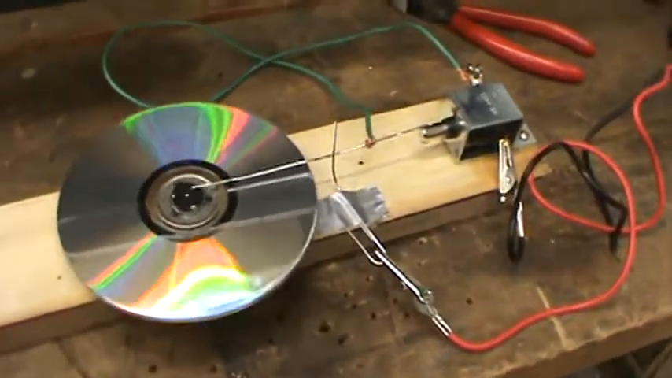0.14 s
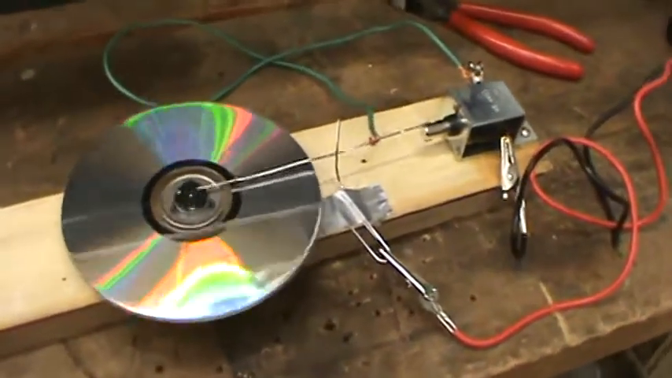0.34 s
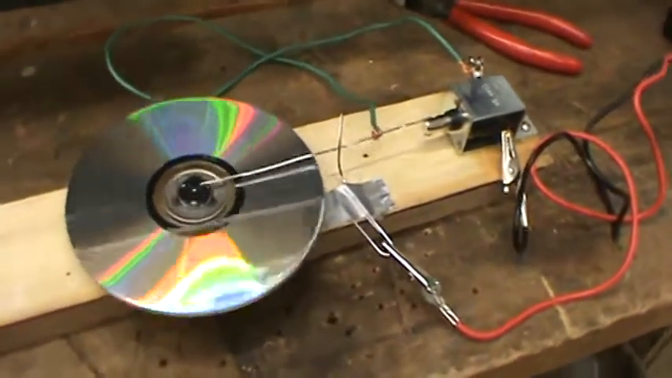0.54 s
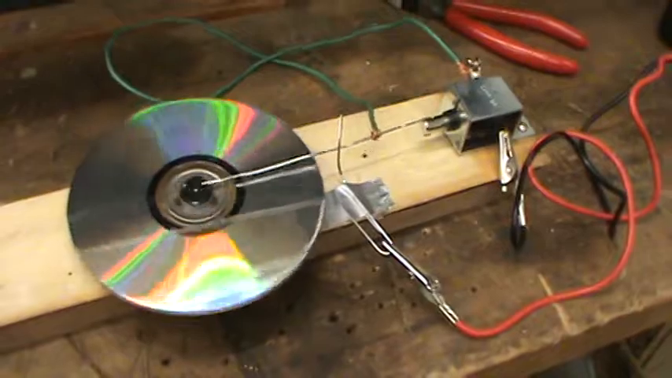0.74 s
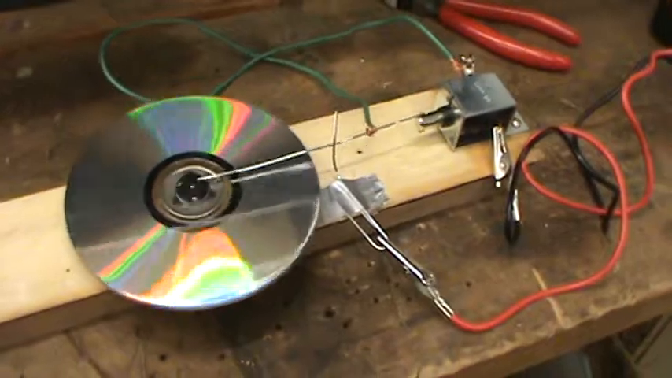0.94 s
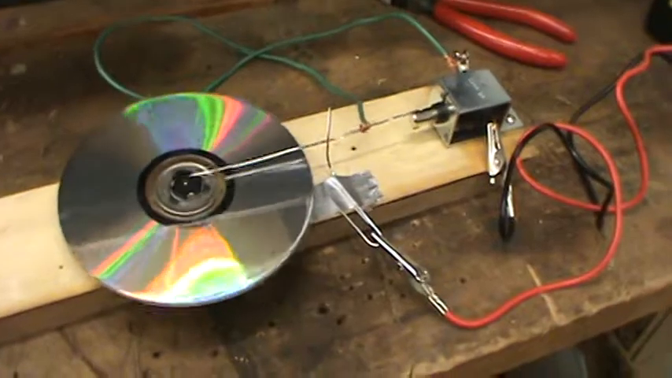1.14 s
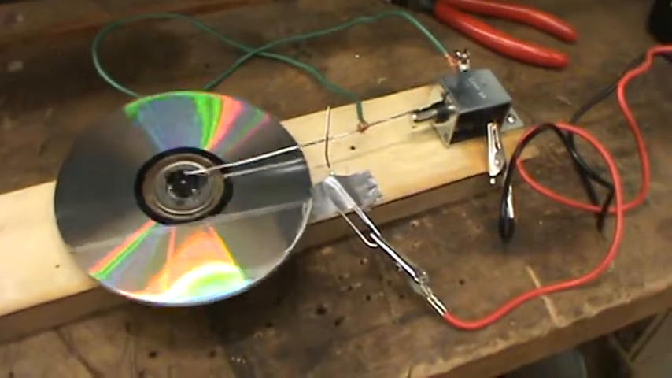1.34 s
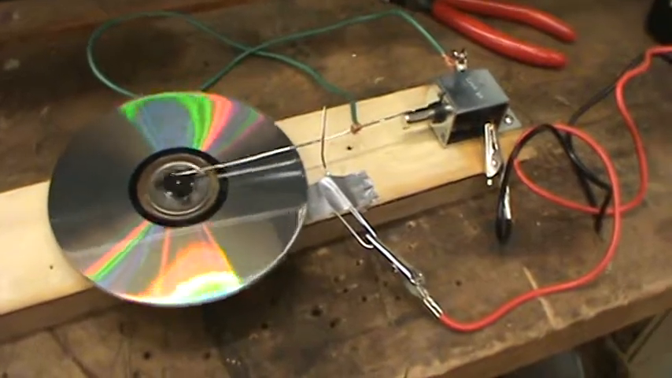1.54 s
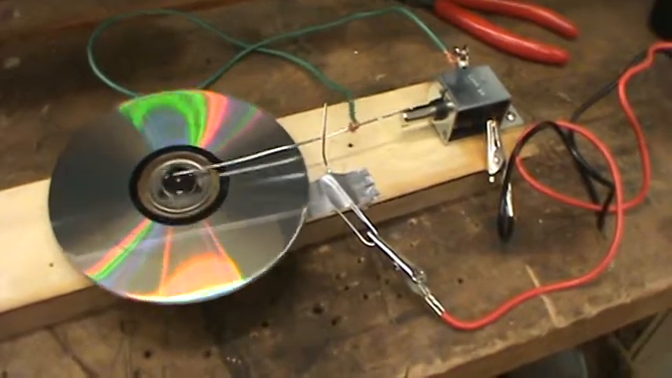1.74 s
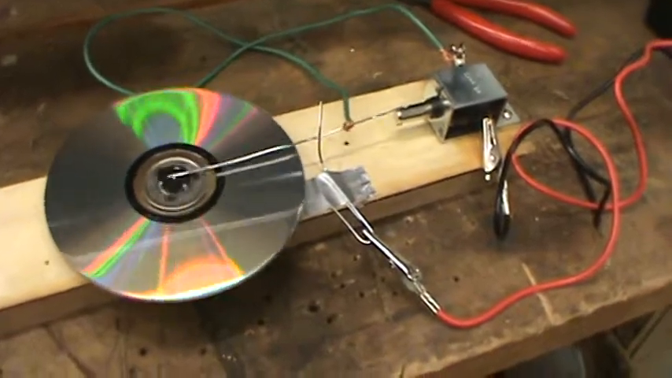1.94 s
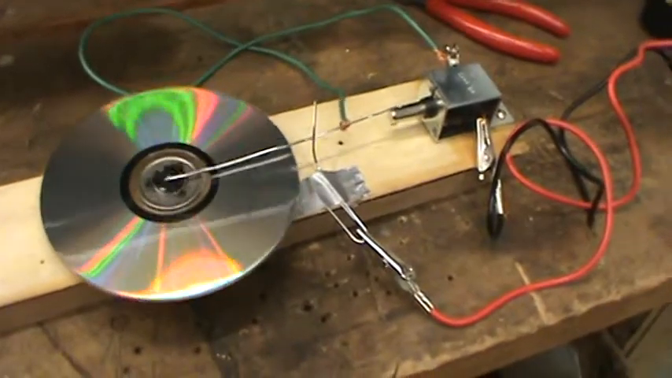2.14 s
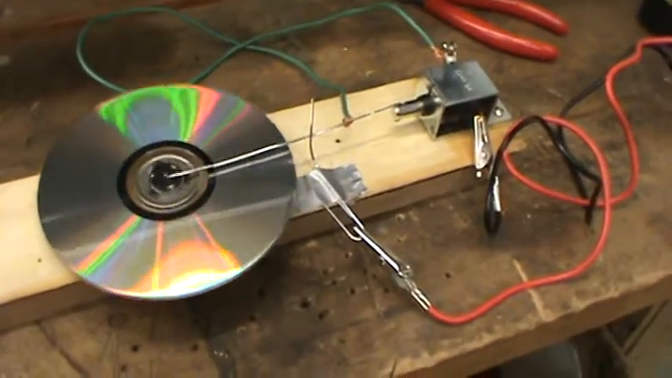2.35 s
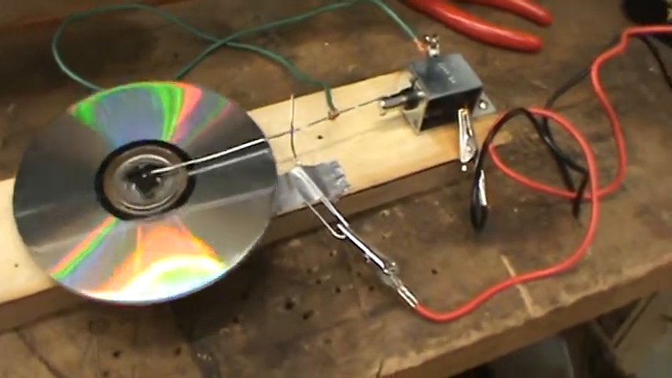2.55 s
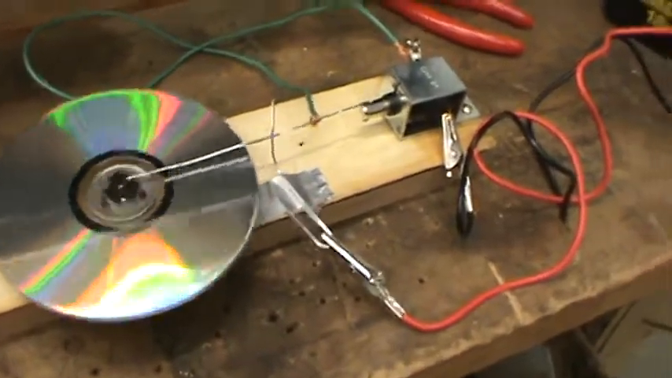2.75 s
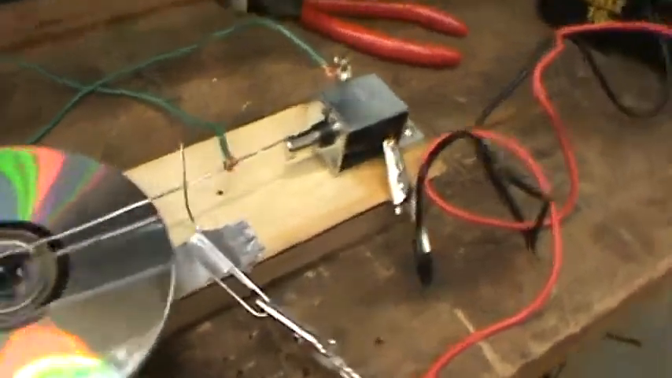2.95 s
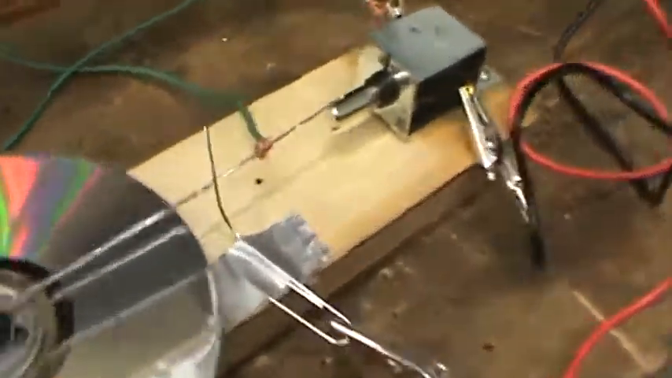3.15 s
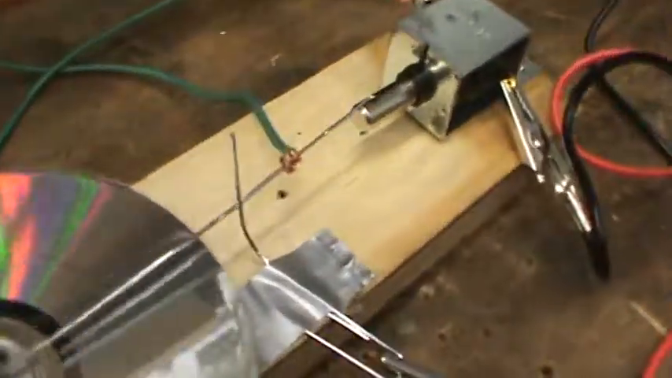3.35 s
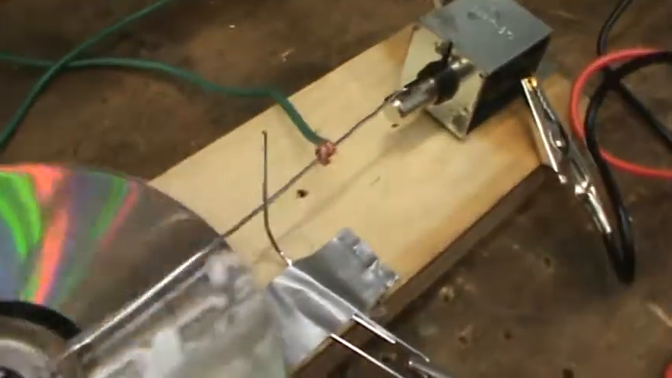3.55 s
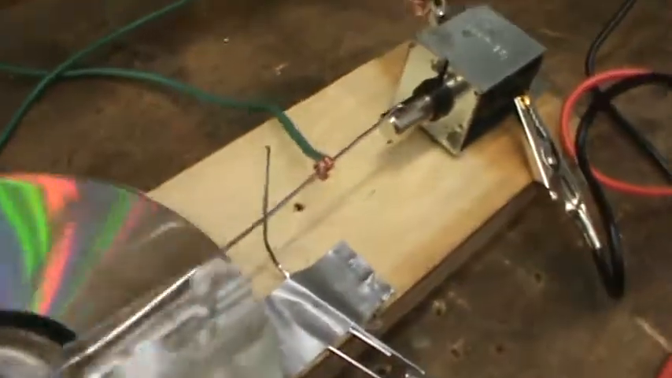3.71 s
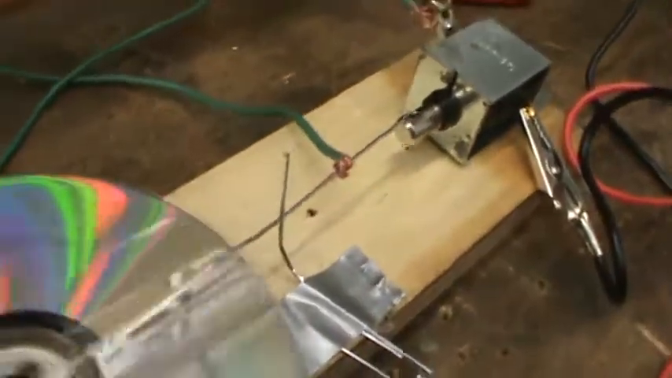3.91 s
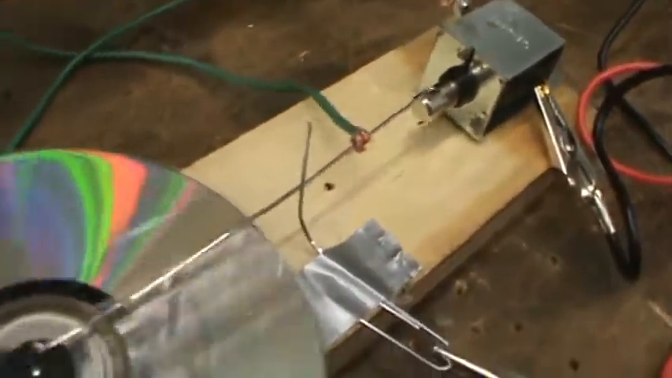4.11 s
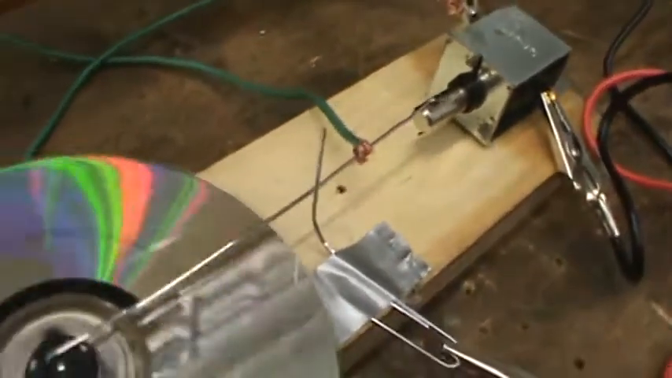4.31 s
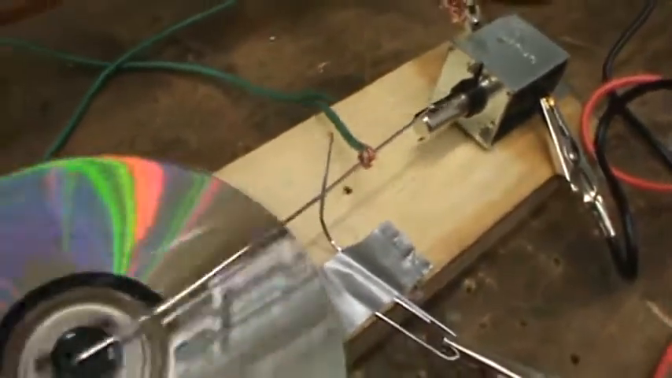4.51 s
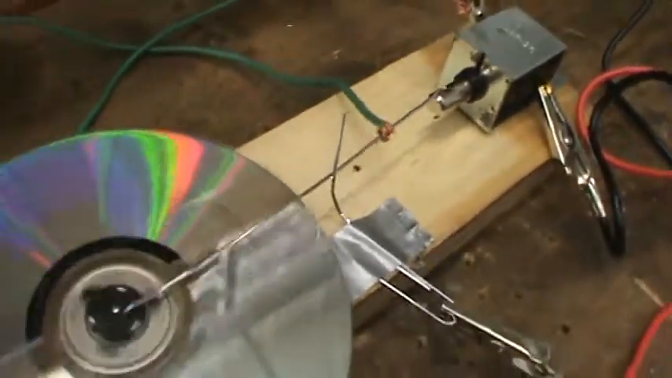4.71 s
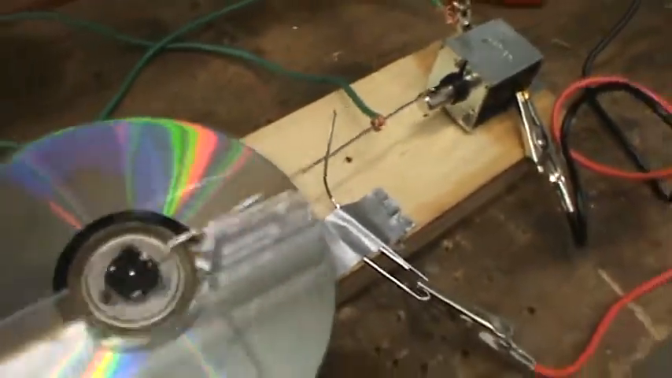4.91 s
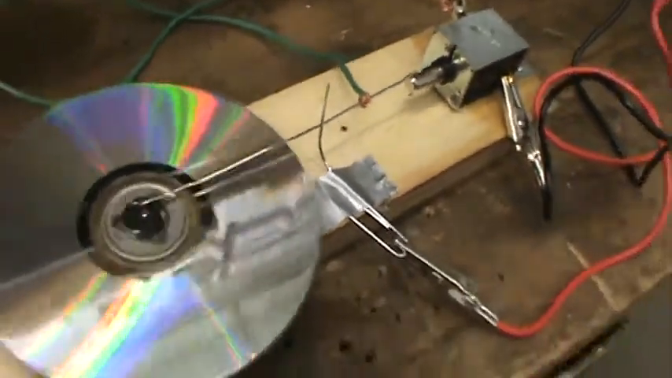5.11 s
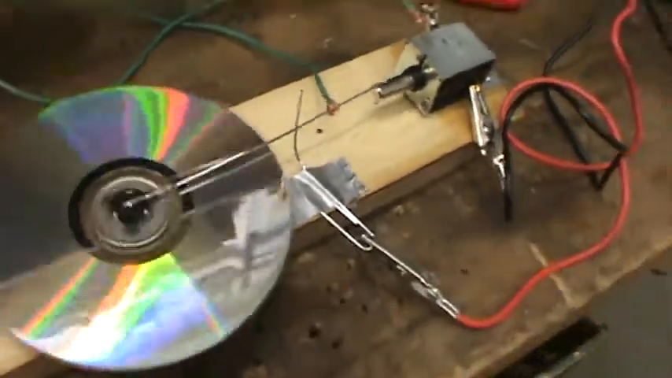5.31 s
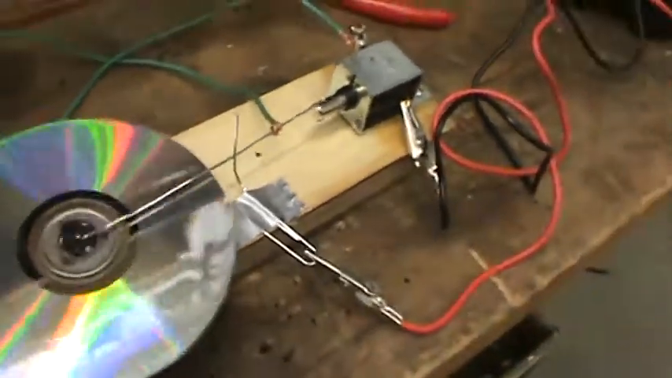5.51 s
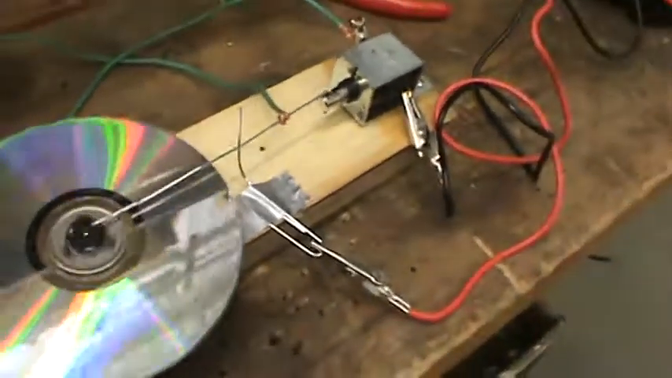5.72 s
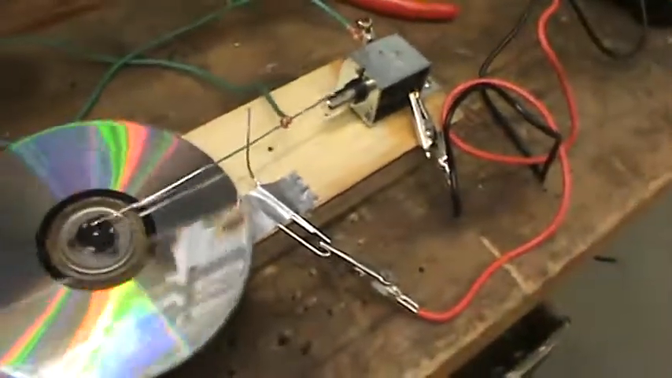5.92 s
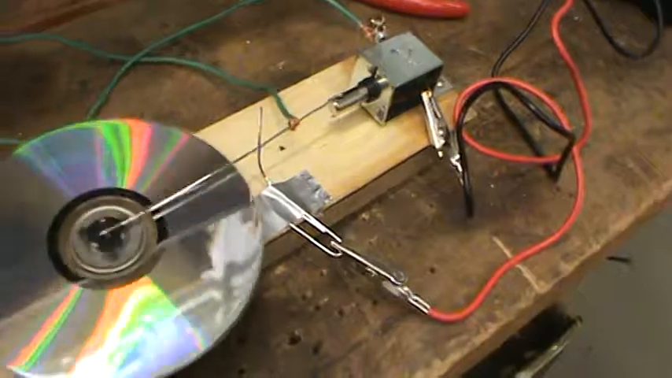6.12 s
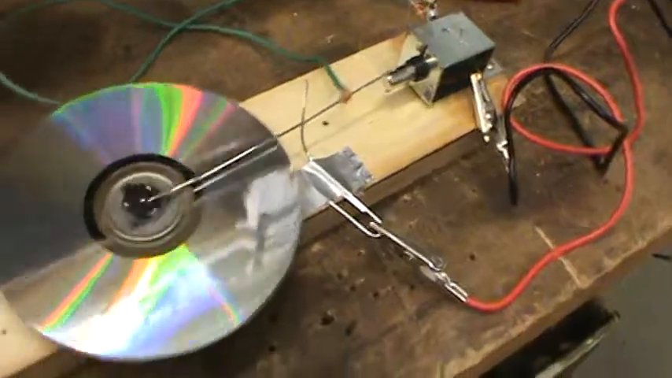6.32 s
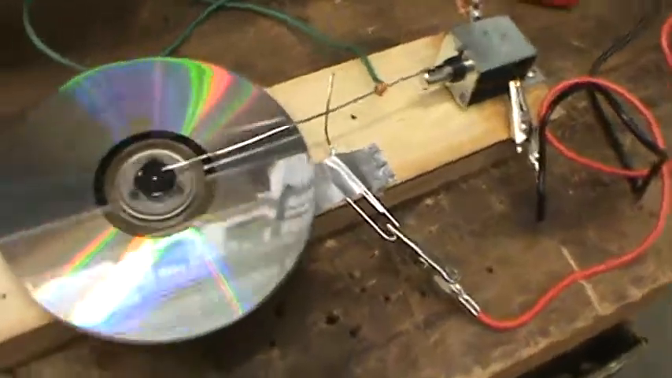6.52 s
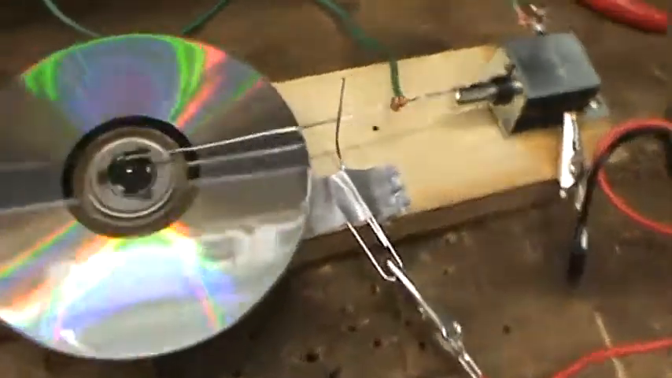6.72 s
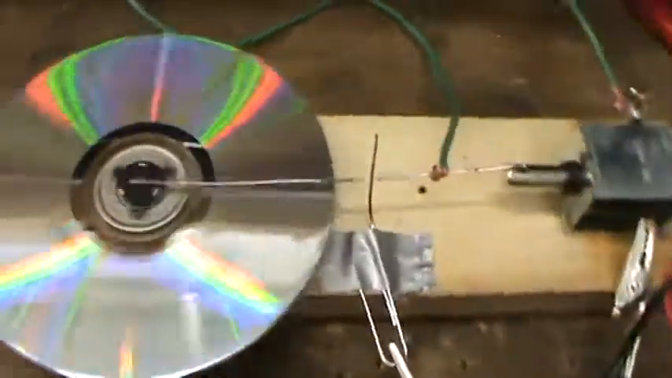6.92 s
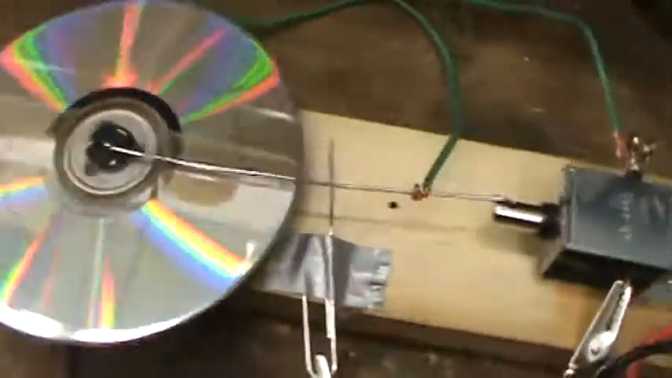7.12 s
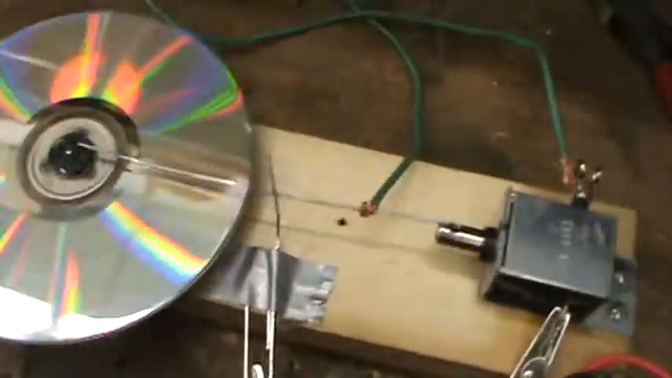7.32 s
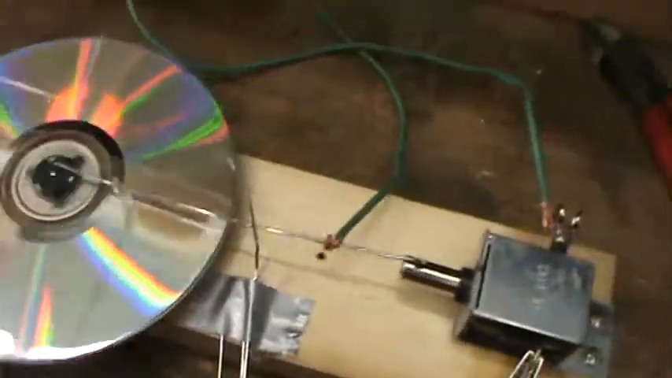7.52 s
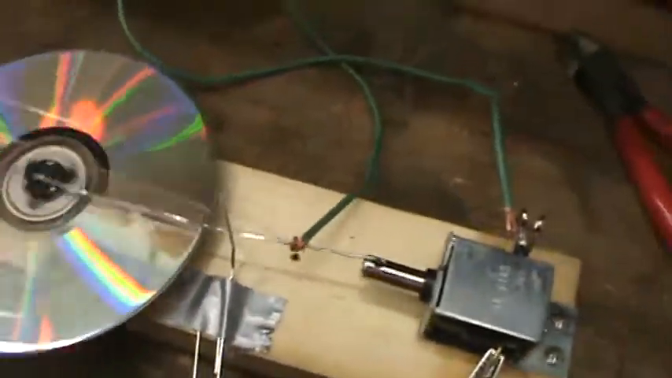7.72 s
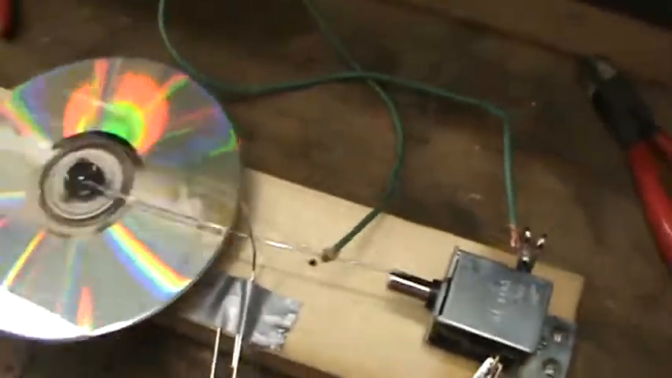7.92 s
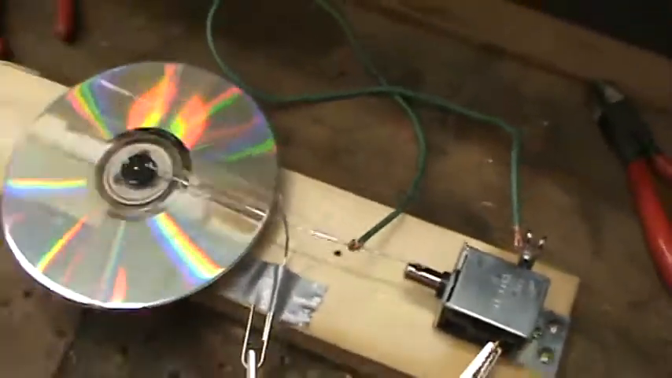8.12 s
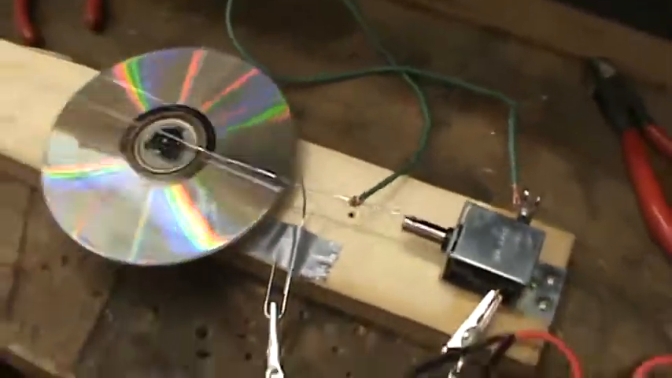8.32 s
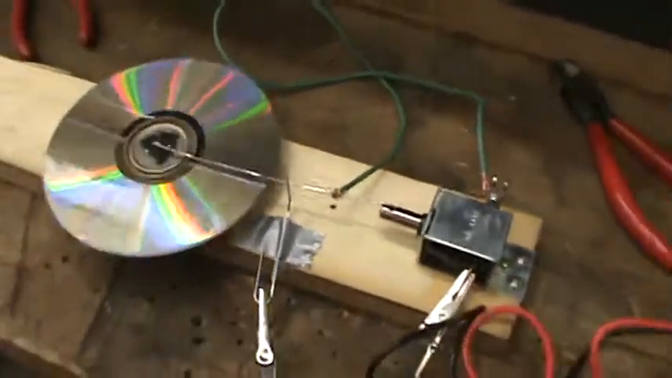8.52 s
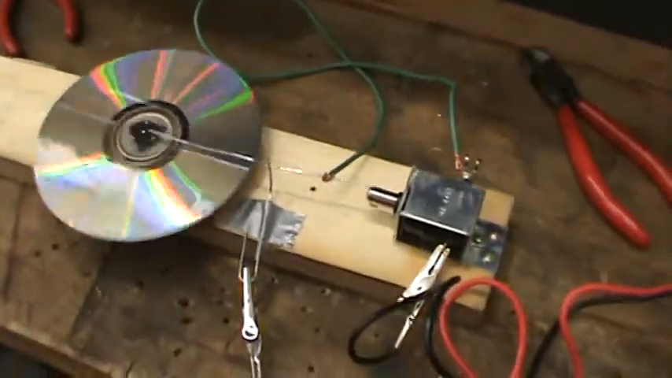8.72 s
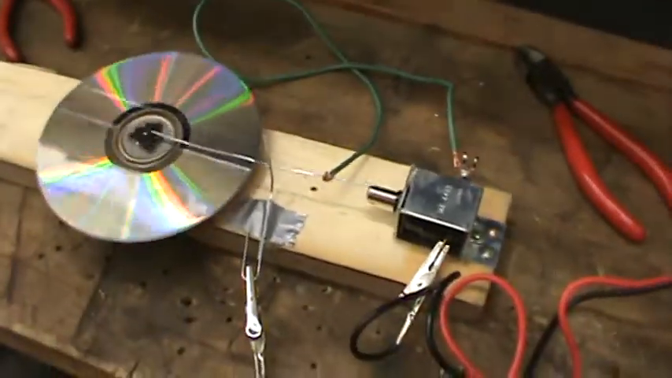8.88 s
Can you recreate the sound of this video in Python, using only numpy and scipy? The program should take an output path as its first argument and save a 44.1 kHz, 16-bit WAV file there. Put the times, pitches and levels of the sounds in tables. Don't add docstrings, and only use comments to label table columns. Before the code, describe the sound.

Fast dry mechanical clatter, already running at the start and never stopping. A springy wire ticks, a plunger knocks in its metal frame and snaps home hard, then scrapes back while loose linkage rattles. The pace gains slightly, and the ticks and rattling grow sharper when the microphone moves closer, around the middle and again near seven seconds. Small workshop, little echo, quiet airy hiss behind.

```python
import sys
import numpy as np
from scipy import signal
from scipy.fft import rfft, irfft, next_fast_len
from scipy.io import wavfile
from scipy.ndimage import uniform_filter1d

SR = 44100
rng = np.random.default_rng(int(sys.argv[2]) if len(sys.argv) > 2 else 0)


def inscribe(sig):
    pcm = np.round(np.clip(np.atleast_2d(sig).T, -1, 1) * 32767)
    wavfile.write(sys.argv[1], SR, pcm.astype(np.int16))


def gain_from_db(level_db):
    decades = np.asarray(level_db, float) / 20
    return 10 ** decades


N = 394694

# hz, level_db (per Hz)
AIR_SPECTRUM = [(30, -23), (200, -12), (1000, -8), (6000, -13.5), (11000, -17.5), (16000, -11)]
# hz, t60_s
ROOM_DECAY = [(300, 0.5), (10000, 0.064)]
# hz, left_minus_right_db
CAPSULE_LEAN = [(60, -1), (1300, 0.3), (2300, 1.5), (4400, 1.2), (9000, -0.5), (14000, -1.5)]
# time_s, overhead (-1..2.2), bench_db, rattle_db, coil_side (about -1..1)
CAMERA_PATH = [(0, -0.55, -54.5, -4, 0.4), (1.4, -1, -52.5, 1, 0.18), (2.7, -0.98, -52.5, 2.5, 0.0078),
               (3.2, 0.38, -50.5, 3.5, -0.36), (4.0, 0.027, -47.5, 6, -0.81),
               (4.6, -0.15, -48.5, 5, -0.031), (5.2, -0.72, -50.5, 0.5, 0.62),
               (6.4, -0.87, -52, -1.5, 0.24), (6.8, -0.27, -49.5, -1.5, 1.1), (7.3, 1.86, -48.5, 5, 0.8),
               (7.9, 2.2, -47.5, 2.5, 0.6), (8.4, 1.1, -52, 0.5, 0.54), (8.95, 1.3, -52.5, 0.5, 1.05)]
# time_s, left_minus_right_db
CAMERA_PAN = [
    (0.0, -2),
    (0.05, -0.5),
    (2.52, 0),
    (4.16, 1),
    (4.29, 0.5),
    (8.25, -1),
    (8.95, -0.5),
]

# turn, period_ms (to the next snap)
TURN_PERIOD = [(0, 212.43), (3, 196.37), (6, 183.76), (10, 176.48), (15, 171.6), (20, 167.01), (25, 163.85),
               (29, 159.66), (33, 159.87), (37, 158.88), (41, 158.99), (44, 159.88), (47, 157.17),
               (51, 155.49)]
# time_s, snap_db, slide_hiss_db
STROKE_EFFORT = [(0.0, -4, -39.6), (0.9, -3.5, -37.0), (1.9, -3.5, -40.5), (3.0, -4, -39.5),
                 (4.3, -4, -37.5), (5.2, -3, -35.5), (6.2, -5, -35.5), (7.0, -4, -34.6), (7.801, -4.5, -35),
                 (8.9, -5.5, -35)]
# time_s, late_ms, more_db
UNEVEN_SNAPS = [(0.33, 1.0, -1.5), (0.93, -1.1, -1.0), (1.5, 1.4, 0.5), (2.03, -3.0, 0.0),
                (2.39, 0.6, -1.0), (2.91, 1.3, 0.0), (3.42, -1.2, 0.0), (3.92, 0.3, 2.0), (4.26, 0.9, 0.5),
                (4.58, -0.7, -2.5), (5.07, 0.2, -2.0), (5.39, 1.1, 0.0), (5.55, -0.7, -3.0),
                (5.87, -1.3, 0.5), (6.99, -1.4, 0.5), (7.15, 1.7, -1.0), (7.3, -1.9, 1.0),
                (7.47, 0.9, -2.0), (8.1, -0.4, 1.5), (8.57, 1.0, 0.5)]
# time_s, slide_more_db
UNEVEN_RUBS = [(1.31, 1.5), (1.5, 2), (1.68, -1.5), (2.03, 3.5), (2.56, 2.5), (3.08, 2.5), (3.25, -1.5),
               (7.15, -1), (7.3, 2)]

# pitch_hz, width_hz, level_db
BOARD_RINGS = [(138, 15, 1.5), (179.9, 76.5, -2.5), (239, 50.3, -1), (395.4, 36.4, -3), (598, 99, -9),
               (797, 103, -6.5)]
# pitch_hz, width_hz, level_db
BENCH_SWAY = [(92, 12, 0)]
# turn (0-1), level_db
SHAKE_CYCLE = [(0, 9), (.12, 3.5), (.4, 2.5), (.72, -4), (.92, 6.5), (1, -2)]
# pitch_hz, width_hz, level_db
BEARING_RINGS = [(10300, 900, -6), (13400, 600, 0.5), (14200, 800, -4), (15400, 900, -7)]
# start_s, more_db
BEARING_SQUEAKS = [(0.018, 0), (0.234, 3), (0.435, 3), (0.644, 1), (0.836, 3), (1.035, 4), (1.222, 7),
                   (1.408, 4), (1.591, 6), (1.772, 6), (1.951, 9), (2.13, 7), (2.306, 8), (2.479, 6),
                   (2.66, 6), (2.837, 6), (3.011, 10), (3.182, 10), (3.344, 8), (3.515, 9), (3.69, 7),
                   (3.853, 12), (4.018, 9), (4.179, 11), (4.351, 11), (4.516, 9), (4.68, 8), (4.843, 9),
                   (4.981, -9), (5.165, 5), (5.329, 10), (5.482, 7), (5.646, 7), (5.804, 8), (5.964, 9),
                   (6.121, 7), (6.283, 6), (6.446, 8), (6.601, 7), (6.766, 15), (6.917, 6), (7.074, 6),
                   (7.239, 2), (7.376, 3), (7.551, 4), (7.713, 3), (7.873, 3), (8.033, 4), (8.193, 0),
                   (8.354, 2), (8.484, -13), (8.666, -1), (8.794, -14)]
# turn (0-1), level_db
RATTLE_CYCLE = [(0, 5.5), (.2, -25), (.3, 0), (.42, 0.5), (.65, -0.5), (.76, -6), (.91, 9), (1, 9)]

# pitch_hz, width_hz, level_db, overhead_more_db, coil_side_more_db
WIRE_RINGS = [(6350, 380, -9, -2, -3), (7560, 770, -2, -1, 3), (8530, 1140, -4, 1.5, 1),
              (10170, 1250, -11.5, -6, -5), (14800, 2700, -20, -3, -2)]
# start_s, tick_db, scrape_db
WIRE_CLOSINGS = [(0.063, -29.5, -25.5), (0.2776, -25, -24.5), (0.4864, -25, -24), (0.6883, -23, -24.5),
                 (0.8834, -28, -24.5), (1.0781, -27, -27.5), (1.2681, -29, -25.5), (1.454, -22, -23.5),
                 (1.6343, -24, -24.5), (1.8123, -22, -23.5), (1.9916, -20, -24.5), (2.1698, -22, -23.5),
                 (2.345, -25, -24.5), (2.5206, -23, -22.5), (2.6942, -26, -22.5), (2.8661, -19.5, -24),
                 (3.038, -20, -22.5), (3.2083, -19, -19.5), (3.379, -17, -19), (3.5472, -19, -19),
                 (3.7165, -19, -19), (3.8842, -18, -19.5), (4.0495, -14, -19.5), (4.2154, -14, -20),
                 (4.38, -19, -21), (4.5461, -16, -21.5), (4.7098, -13, -20.5), (4.8734, -20, -21.5),
                 (5.0359, -25, -23), (5.1962, -20.5, -22.5), (5.3558, -21, -25), (5.5151, -18, -26),
                 (5.674, -19, -23.5), (5.8342, -17, -24), (5.993, -17, -25.5), (6.153, -21, -22.5),
                 (6.314, -20, -24), (6.473, -18, -24), (6.633, -19, -23), (6.79, -18, -21),
                 (6.9472, -10, -21), (7.1055, -13, -19.5), (7.2658, -14, -18.5), (7.4273, -15, -18),
                 (7.5875, -13, -20), (7.746, -13, -20), (7.905, -18, -21), (8.063, -19, -21.5),
                 (8.221, -16, -19.5), (8.3775, -18, -19.5), (8.5336, -23, -24), (8.6903, -21, -28),
                 (8.8465, -26.5, -21)]
# turn (after closing), level_db
WIRE_CHATTER = [(.056, 1), (.064, -2.5), (.073, 0), (.084, 0), (.104, -6), (.113, -3.5), (.135, -17),
                (.16, -3), (0.188, -10)]
# start_s, peak_db
WIRE_FLICKS = [(.91, -16), (3.2382, -18), (3.4093, -14.5), (3.746, -15), (3.7594, -15), (3.9137, -11.5),
               (5.2257, -16), (5.7062, -8), (6.1834, -17), (7.1322, -10), (7.1408, -13.5), (7.4353, -9),
               (7.462, -16), (7.618, -19), (7.9272, -17), (7.9354, -14), (8.2508, -17.5), (8.408, -16)]
# turn (after closing), level_db
WIRE_FIZZ = [(0, -10), (.045, -12.5), (.055, 2), (.085, -4), (.095, -9), (.11, -4), (.125, -7.5),
             (.16, -5.5), (.2, -6.5), (.24, -10)]

# pitch_hz, width_hz, level_db, coil_side_more_db
BORE_RINGS = [(1730, 1230, 1, 0.5), (3126, 294, 3, 1), (3535, 350, 0.5, 1), (4220, 440, 3, 1.5),
              (4980, 440, 0.5, 1.5), (5670, 290, 6, 1.5), (6550, 420, 4.5, 2), (7100, 500, 2, 1.5),
              (7780, 640, 0.5, 1.5), (8710, 440, 2, 1), (9700, 2600, -9.5, 1.5)]
# turn (0-1), level_db
SLIDE_CYCLE = [(0, -2), (.1, 1.5), (.3, -3), (.55, -9.5), (.78, -12.5), (.95, -7.5), (1, -52.5)]
# time_s, half_length_s, level_db
BORE_BINDS = [
    (5.468, 0.0426, -45),
    (7.361, .06, -35.5),
    (7.83, 0.041, -46),
]

# pitch_hz, width_hz, level_db, overhead_more_db, coil_side_more_db
FRAME_RINGS = [(385.6, 19, -9, 2.5, -5), (819, 154, -13.5, 4.5, -3.5), (1261, 30, -6.5, 7, -2.5),
               (1619, 107, 1, 6.5, -6.5), (1854, 214, 3.5, 1.5, -2.5), (2118, 310, 4, 5.5, -1),
               (2518, 490, -3, 2.5, 2.5), (2836, 190, -3.5, 7, 1.5), (3146.8, 140, -6, -10, -1),
               (4330, 1140, -14, -2, 0)]
# start_s, peak_db, loudest_ring_hz
ROD_SLAPS = [(0.789, -20.5, 2000.0), (0.8045, -24, 1950), (1.5886, -23.5, 1980), (1.7226, -14.5, 2650),
             (1.7482, -20.5, 1960), (1.9, -25, 2030), (2.0814, -22.5, 2220), (2.2766, -20.5, 1910.0),
             (2.6063, -19, 1830), (2.6496, -22, 2080.0), (2.7887, -23, 2080.0), (2.8017, -23, 1750.0),
             (2.8233, -24, 2000.0), (2.9688, -30, 2090.0), (2.993, -23, 1760), (3.1281, -19.5, 1960.0),
             (3.1445, -24, 1670), (3.1693, -23, 1610), (3.1861, -22.5, 1990), (3.2914, -18.5, 1760.0),
             (3.3127, -20, 1940.0), (3.3351, -26, 1570), (3.4722, -18.5, 2020.0), (3.4843, -15, 1660),
             (3.5046, -20, 1590), (3.6273, -21, 2020.0), (3.6386, -26, 1930.0), (3.6512, -22.0, 1570.0),
             (3.669, -25, 1590.0), (3.7994, -18.5, 1770.0), (3.8249, -15, 1783), (3.8455, -21, 1600.0),
             (3.869, -22, 2050.0), (3.9668, -18, 1800), (3.9924, -13.5, 1760), (4.0139, -21.5, 1650.0),
             (4.0259, -18.5, 2120), (4.1331, -8.5, 2120), (4.153, -19, 2050.0), (4.4625, -17.5, 2090),
             (4.4889, -29, 1720.0), (4.5212, -21.0, 2050.0), (4.629, -14, 1760), (4.6494, -12, 1730),
             (4.6723, -23, 1760.0), (4.6851, -24, 2100.0), (4.791, -16.0, 2010.0), (4.8031, -23.0, 2030.0),
             (4.8341, -20, 2100), (4.9983, -20.5, 2120), (5.1145, -20.0, 1900), (5.1341, -19, 2080.0),
             (5.2773, -19, 1980), (5.295, -20, 1960), (5.4596, -17, 1920), (5.4828, -22, 2030.0),
             (5.4975, -21, 2160.0), (5.5959, -15.5, 2030.0)]
# start_s, peak_db, loudest_ring_hz
LATE_SLAPS = [(5.6052, -18, 2440.0), (5.9137, -18.5, 2071), (5.9346, -17.0, 1980), (5.9585, -22.0, 2050.0),
              (6.0816, -12, 2240.0), (6.2531, -21, 2000.0), (6.3938, -23, 2030.0), (6.4127, -15.5, 1993),
              (6.4378, -24.5, 1870.0), (6.5514, -15.5, 1800.0), (6.561, -24.0, 1800.0),
              (6.5709, -20, 1920.0), (6.7138, -20, 1970.0), (6.7338, -16.5, 1650.0), (6.7551, -21, 1640.0),
              (6.91, -23, 1640.0), (7.0334, -19.5, 2035), (7.181, -27, 2180), (7.198, -21, 2050.0),
              (7.2054, -21, 1770.0), (7.3503, -18, 2190.0), (7.3925, -20.0, 1963), (7.5211, -26, 2220.0),
              (7.5457, -24, 1970), (7.6661, -17.5, 2150.0), (7.6907, -13, 2240), (7.713, -20, 2140.0),
              (7.725, -23.0, 2100.0), (7.8251, -15.0, 2220), (7.836, -22, 2160.0), (7.8439, -17, 2100.0),
              (7.8689, -23.0, 2080.0), (7.9827, -29, 2200.0), (7.9934, -23, 1860.0), (8.006, -15, 2277),
              (8.0268, -30, 2253), (8.1413, -16, 2190.0), (8.1537, -17, 2100.0), (8.162, -15.5, 2090),
              (8.1841, -23, 2150.0), (8.2988, -17.5, 2200.0), (8.3088, -18, 1750), (8.3172, -19.5, 1610),
              (8.3401, -24.5, 2057), (8.3523, -25, 1920.0), (8.4561, -13.5, 2060), (8.4652, -16.5, 1660.0),
              (8.4795, -17, 2180.0), (8.5044, -19.5, 2050), (8.6195, -22, 1700.0), (8.6352, -17.5, 2170),
              (8.6543, -22, 1980.0), (8.7722, -16, 2350), (8.7931, -14, 2170), (8.8166, -19.5, 2090.0),
              (8.8365, -25.5, 1740.0), (8.9238, -21, 2200.0), (8.9466, -14, 2220.0)]
# start_s, peak_db
FRAME_KNOCKS = [(0.0843, -12), (0.3032, -8.5), (0.5086, -6.5), (0.7131, -13.0), (0.9059, -10.5),
                (1.103, -16.0), (1.2905, -8.5), (1.4774, -7.5), (1.6571, -7.5), (1.8345, -9), (2.013, -6),
                (2.19, -3.5), (2.3662, -6), (2.5426, -10.5), (2.7164, -12), (2.888, -10.5), (3.0601, -6),
                (3.2305, -4), (3.4008, -6.5), (3.5703, -7), (3.7391, -5.5), (3.9067, -6.5), (4.0731, -7.5),
                (4.2375, -5), (4.4032, -6.5), (4.5683, -4), (4.7313, -6), (4.8958, -7.0), (5.0603, -8),
                (5.2186, -9.5), (5.378, -7.5), (5.5411, -13.5), (5.6975, -7.5), (5.856, -6.5), (6.0194, -9),
                (6.175, -9.0), (6.3364, -6), (6.4997, -5.5), (6.6539, -6), (6.8117, -5.5), (6.969, -6.0),
                (7.1275, -6.5), (7.2873, -6), (7.4508, -5.5), (7.6093, -7.5), (7.7688, -7), (7.9279, -6.5),
                (8.0891, -7), (8.2437, -7), (8.4006, -7), (8.5565, -6), (8.7135, -7.5), (8.869, -8)]
# start_s, peak_db
SECOND_KNOCKS = [(0.1029, -11), (0.3187, -9.5), (0.5216, -6), (0.727, -10.5), (1.116, -12.5), (1.3039, -16),
                 (3.4105, -14.5), (3.751, -14), (4.085, -11), (4.3934, -20), (4.428, -18), (6.836, -16),
                 (7.1518, -20), (7.299, -14)]
# pitch_hz, width_hz, level_db, overhead_more_db, coil_side_more_db
PLUNGER_RINGS = [(1243, 140, -7.5, 3.5, -1), (1770, 1800, -18.5, 3, 1), (2953, 133, -2, 3, -2),
                 (3120, 73, 0.5, -3, -0.5), (3750, 190, -2, -0.5, 1), (4160, 200, -3.5, -1, 1),
                 (5203, 400, -1.5, 1.5, 0), (5670, 270, -3.5, 0, 4), (6266, 500, -1, 1, 1),
                 (6965, 410, 1, -0.5, 3), (7790, 850, -3, 1, 1), (8417, 220, 1, 1.5, -4),
                 (9600, 1430, -12, 1.5)]
# start_s, peak_db
REBOUNDS = [(2.2226, -11.5), (2.9221, -10), (3.6009, -14), (4.2681, -4.5), (4.763, -10.5), (5.4092, -5),
            (5.7281, -4.5), (6.2063, -5), (6.8416, -5), (7.0005, -5.5), (7.1583, -5.5), (7.4794, -6),
            (8.5856, -7.5)]

FIRST_SNAP_S, TURNS = 0.11252, 53
SCATTER_MS, SCATTER_DB = 0.57, -0.5
SPOT_WIDTH, SPOT_DB = 0.28, 3
UNEVEN_DB = 1.5
EVEN_HZ = 450
SQUEAK_S = 0.04
TOP_HZ = 15900


def unit(x):
    return x / np.sqrt(np.mean(x ** 2) + 1e-20)


def along(points, hz):
    f, v = np.transpose(points)
    return np.interp(np.log(hz + 1), np.log(f + 1), v)


def over_turn(points, turn):
    return gain_from_db(np.interp(turn % 1, *np.transpose(points)))


def wobble(rate):
    knots = rng.standard_normal(int(N * rate / SR) + 2)
    return np.interp(np.arange(N) * rate / SR, np.arange(len(knots)), knots)


def body(modes, f, view=()):
    total = 0
    for k, (pitch, width, db, *lobes) in enumerate(modes):
        heard_db = db + sum(lobe * place for lobe, place in zip(lobes, view))
        ring = 1j * f * width / (pitch * pitch - f * f + 1j * f * width)
        total = total + (-1) ** k * gain_from_db(heard_db) * ring
    return total


def filtered(x, response):
    m = next_fast_len(N + SR // 4)
    return irfft(rfft(x, m) * response(np.fft.rfftfreq(m, 1 / SR)), m)[..., :N]


def pair(apart):
    a, b = rng.standard_normal((2, N))
    return np.array([a + apart * b, a - apart * b])


def beat():
    ms = np.interp(np.arange(TURNS), *np.transpose(TURN_PERIOD))
    return FIRST_SNAP_S + (np.cumsum(ms) - ms) / 1000


def per_turn(odd):
    s, *columns = np.transpose(odd)
    which = np.abs(s[:, None] - beat()).argmin(1)
    return [np.bincount(which, c, TURNS) for c in columns]


def strokes():
    s, *columns = np.transpose(STROKE_EFFORT)
    snap_db, slide_db = [np.interp(beat(), s, c) for c in columns]
    late_ms, more_db = per_turn(UNEVEN_SNAPS)
    snaps = np.c_[beat() + late_ms / 1000, snap_db + more_db]
    return snaps, slide_db + per_turn(UNEVEN_RUBS)[0]


def crank():
    snaps, slide_db = strokes()
    s = snaps[:, 0]
    s = np.r_[2 * s[0] - s[1], s, 2 * s[-1] - s[-2]]
    turn = np.interp(np.arange(N) / SR, s, np.arange(len(s)))
    return turn, np.r_[slide_db[0], slide_db, slide_db[-1]][turn.astype(int)]


def still_air():
    hiss = unit(filtered(pair(apart=1.0), lambda f: gain_from_db(along(AIR_SPECTRUM, f))))
    return gain_from_db(-49.0 + 2.4 * wobble(14)) * hiss


def shop(x):
    hz, t, z = signal.stft(rng.standard_normal((2, SR // 3)), SR, nperseg=256)
    fade = gain_from_db(-60 * t / along(ROOM_DECAY, hz)[:, None])
    tail = signal.istft(z * fade, SR, nperseg=256)[1]
    tail = tail / np.linalg.norm(tail[0])
    late = np.pad(x.mean(0), (200, 0))[None]
    return signal.fftconvolve(late, tail, axes=1)[:, :N]


def bench_shake(turn, bench_db):
    board = lambda f: body(BOARD_RINGS, f) * (0.5 + f * f / (f * f + 85 ** 2))
    shake = unit(filtered(pair(apart=0.057), board))
    return gain_from_db(bench_db + 1.84 * wobble(24)) * over_turn(SHAKE_CYCLE, turn) * shake


def bench_sway(turn):
    jolts = np.diff(np.floor(turn), prepend=0) * gain_from_db(1.5 * wobble(6))
    swing = unit(filtered(jolts, lambda f: body(BENCH_SWAY, f) ** 2))
    return gain_from_db(-62 + 2 * wobble(20)) * swing


def bearing_squeak():
    s, squeak_db = np.transpose(BEARING_SQUEAKS)
    t = np.arange(N) / SR
    which = np.clip(np.searchsorted(s, t) - 1, 0, TURNS - 1)
    swell = np.abs(np.sin(np.pi * np.clip((t - s[which]) / SQUEAK_S, 0, 1))) ** 0.5
    rub = swell * gain_from_db(squeak_db[which] + 3.9 * wobble(74))
    squeak = unit(filtered(pair(apart=0.76), lambda f: np.abs(body(BEARING_RINGS, f)) ** 1.5))
    return gain_from_db(-50.5) * rub * squeak


def rattle(turn, rattle_db):
    taps = gain_from_db(13.0 * np.tanh(wobble(260) / 2)) * pair(apart=0.053)
    ringing = unit(filtered(taps, lambda f: body(FRAME_RINGS, f)))
    return gain_from_db(rattle_db - 44.5) * over_turn(RATTLE_CYCLE, turn) * ringing


def wire_drag():
    shut_s, _, scrape_db = np.transpose(WIRE_CLOSINGS)
    t = np.arange(N) / SR
    which = np.clip(np.searchsorted(shut_s, t) - 1, 0, TURNS - 1)
    since = (t - shut_s[which]) / np.gradient(beat())[which]
    specks = gain_from_db(8.4 * np.tanh(wobble(500))) * pair(apart=0.14)
    fizz = unit(filtered(specks, lambda f: body(WIRE_RINGS, f)))
    fizz_db = np.interp(since, *np.transpose(WIRE_FIZZ), left=-60, right=-60)
    return gain_from_db(scrape_db[which] - 8 + fizz_db) * fizz


def slide(turn, slide_db, coil_side):
    grit = gain_from_db(1.8 * wobble(160))
    rub = unit(grit) * pair(apart=0.2)
    far, near = [unit(filtered(rub, lambda f: np.abs(body(BORE_RINGS, f, [side])) ** 1.27))
                 for side in (-1, 1)]
    share = np.clip(0.5 + coil_side / 2, 0, 1)
    hiss = (1 - share) * far + share * near
    load_db = uniform_filter1d(slide_db, 400)
    lasting = np.clip(1 - 0.099 * (load_db + 40), 0, 2)
    t = np.arange(N) / SR
    binding = sum(gain_from_db(db) * np.exp(-((t - s) / half_s) ** 4) for s, half_s, db in BORE_BINDS)
    return (gain_from_db(load_db + 4.5) * over_turn(SLIDE_CYCLE, turn) ** lasting + binding) * hiss


def hits(events, modes, view, t60, blow, fresh, detune, apart, soft_hz, rise, size=1024):
    s, db, *spot_hz = np.transpose(events)
    first = np.round(s * SR).astype(int)
    t = np.arange(size) / SR
    draw = rng.standard_normal((len(s), 4, size))
    habit = unit(uniform_filter1d(draw[:, 3], len(s) // 6, 0))
    fade = gain_from_db(-60 * t / abs(t60))
    force = (habit + fresh * draw[:, 0]) * fade
    ears = force + apart * fade * draw[:, 1] * np.array([1, -1])[:, None, None]
    f = np.fft.rfftfreq(size, 1 / SR) / (1 + detune * draw[:, 2, :1])

    contact = 1 / (1 + 1j * f / (soft_hz * gain_from_db(0.57 * db[:, None]))) ** 2
    spots = sum(body([(hz[:, None], SPOT_WIDTH * hz[:, None], SPOT_DB)], f) for hz in spot_hz)
    contact = contact * (2 + spots)
    uneven = [(pitch, width, level + UNEVEN_DB * draw[:, 2, k + 1, None], *lobes)
              for k, (pitch, width, level, *lobes) in enumerate(modes)]

    push = blow + rfft(ears) * f / (f + 1400)
    broad = uniform_filter1d(np.abs(push.mean(0)) ** 2, size * EVEN_HZ // SR)
    push = push * np.sqrt(broad.mean(0) / broad)
    ring = irfft(push * contact * body(uneven, f, view[:, first, None]), size)
    ring *= (1 - np.exp(-(t / rise) ** 2)) * np.cos(np.pi * t * SR / size / 2)
    ring *= (gain_from_db(db) / np.abs(ring.mean(0)).max(1))[:, None]
    where = (first[:, None] + np.arange(size)).ravel()
    return np.array([np.bincount(where, r.ravel(), N + size)[:N] for r in ring])


def merged(usual_s, usual_db, hard, within_s):
    usual_db = usual_db + SCATTER_DB * np.clip(rng.standard_normal(usual_s.shape), -2, 1)
    rows = np.c_[usual_s.ravel(), usual_db.ravel()]
    free = np.abs(rows[:, :1] - np.transpose(hard)[0]).min(1) > within_s
    in_time = rows[:, 0] < N / SR - 0.001
    return list(map(tuple, rows[free & in_time])) + list(hard)


def wire_ticks(view):
    lap_s = np.gradient(beat())[:, None]
    shut_s, shut_db, scrape_db = np.transpose(WIRE_CLOSINGS)[:, :, None]
    after, tick_db = np.transpose(WIRE_CHATTER)
    scatter_s = SCATTER_MS / 1000 * rng.standard_normal((TURNS, len(after)))
    chatter_s = shut_s + lap_s * after + scatter_s
    ticks = merged(chatter_s, tick_db + scrape_db, WIRE_FLICKS, within_s=0.002)
    ticks = ticks + list(zip(shut_s[:, 0], shut_db[:, 0]))
    return hits(sorted(ticks), WIRE_RINGS, view, t60=0.005, blow=8.3, fresh=1.0, detune=0.021,
                apart=0.12, soft_hz=40000, rise=0.0001, size=512)


def rod_slaps(view):
    return hits(list(ROD_SLAPS) + list(LATE_SLAPS), FRAME_RINGS, view, t60=0.011, blow=8, fresh=0.47,
                detune=0.0088, apart=0.257, soft_hz=10900, rise=0.00025)


def frame_knocks(view):
    knocks = sorted(list(FRAME_KNOCKS) + list(SECOND_KNOCKS))
    return hits(knocks, FRAME_RINGS, view, t60=0.023, blow=6.0, fresh=0.31, detune=0.015,
                apart=0.32, soft_hz=9500, rise=0.00046)


def plunger_snaps(view):
    snaps, _ = strokes()
    blows = sorted(list(map(tuple, snaps)) + list(REBOUNDS))
    return hits(blows, PLUNGER_RINGS, view, t60=0.019, blow=7.2, fresh=0.31, detune=0.0085,
                apart=0.24, soft_hz=22500, rise=0.0001, size=2048)


def contacts(view):
    blows = wire_ticks(view) + rod_slaps(view) + frame_knocks(view) + plunger_snaps(view)
    return filtered(blows, lambda f: (1j * f / (180 + 1j * f)) ** 2)


def scene():
    t = np.arange(N) / SR
    s, *columns = np.transpose(CAMERA_PATH)
    overhead, bench_db, rattle_db, coil_side = [np.interp(t, s, c) for c in columns]
    turn, slide_db = crank()
    air = still_air()
    flywheel = bench_shake(turn, bench_db) + bench_sway(turn) + bearing_squeak()
    steady = flywheel + rattle(turn, rattle_db) + wire_drag() + slide(turn, slide_db, coil_side)
    strikes = contacts(np.array([overhead, coil_side]))
    s, pan_db = np.transpose(CAMERA_PAN)
    pan = gain_from_db(np.interp(t, s, pan_db - pan_db.mean()) * np.array([[0.5], [-0.5]]))
    return pan * (strikes + steady) + gain_from_db(-26.0) * shop(strikes) + air


def band_limit(x):
    return signal.sosfilt(signal.butter(12, 16960, fs=SR, output="sos"), x)


def record(dry):
    lean = lambda f: gain_from_db(along(CAPSULE_LEAN, f) * np.array([[0.5], [-0.5]]))
    top = lambda f: np.where(f < TOP_HZ, 1, gain_from_db(-26)) / (1 + (f / 11500) ** 4) ** 0.19
    mix = filtered(dry, lambda f: lean(f) * top(f))
    return band_limit(mix)


dry = scene()
out = record(dry)
inscribe(out)
```